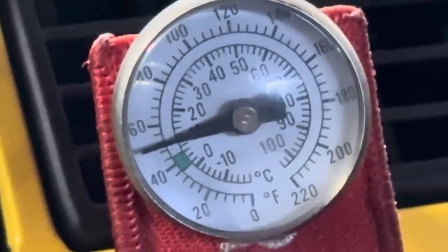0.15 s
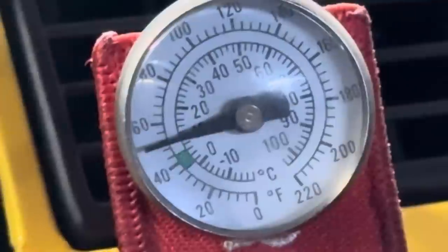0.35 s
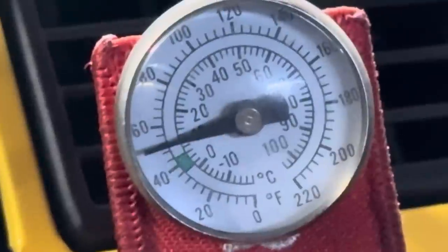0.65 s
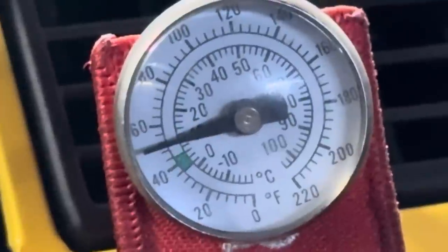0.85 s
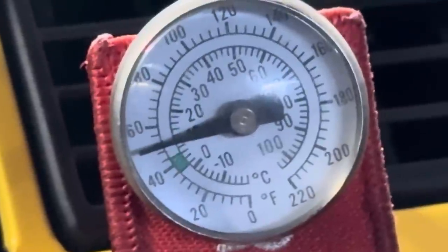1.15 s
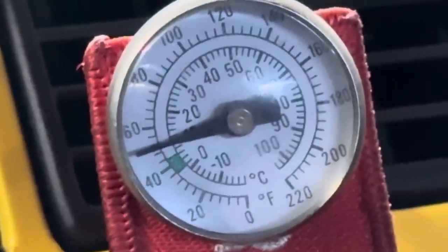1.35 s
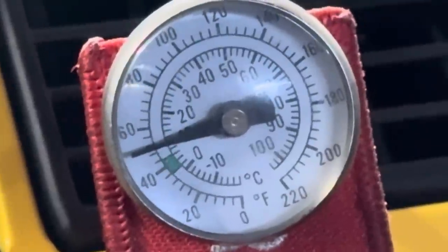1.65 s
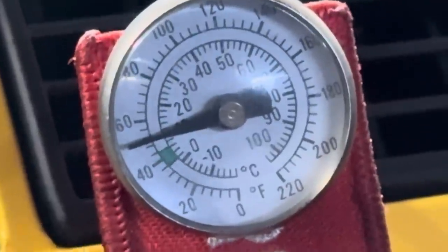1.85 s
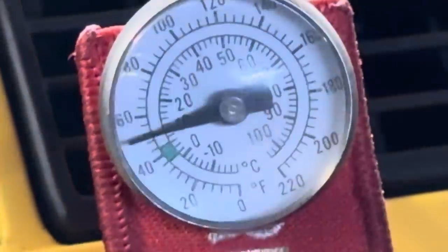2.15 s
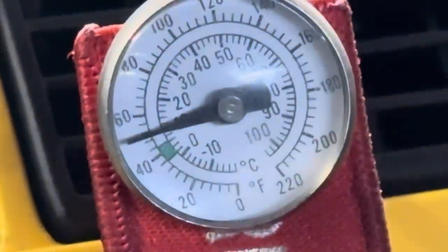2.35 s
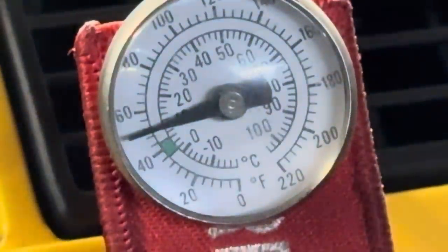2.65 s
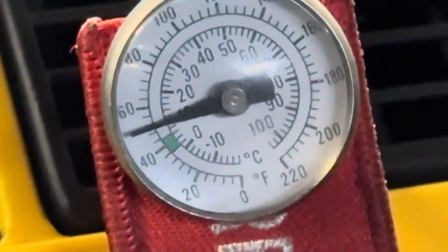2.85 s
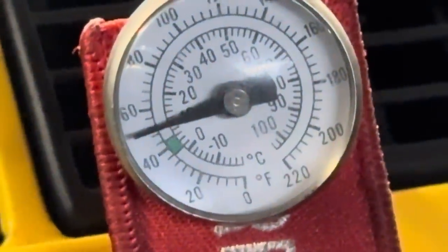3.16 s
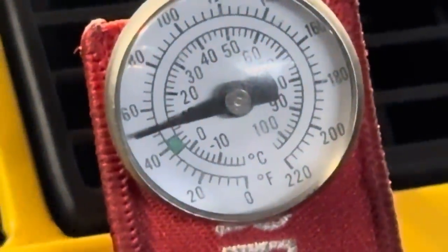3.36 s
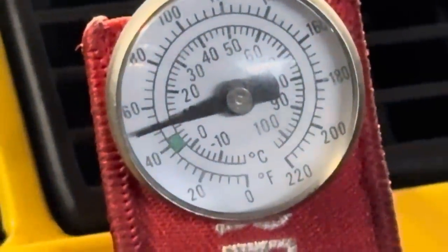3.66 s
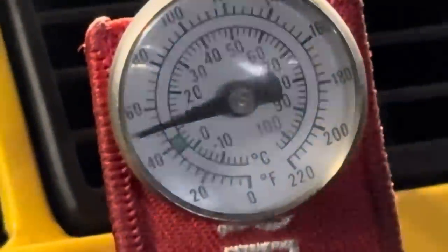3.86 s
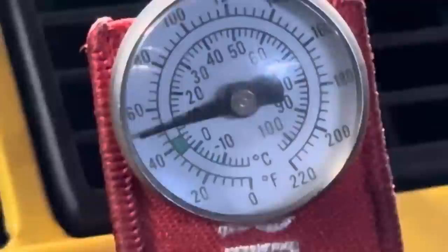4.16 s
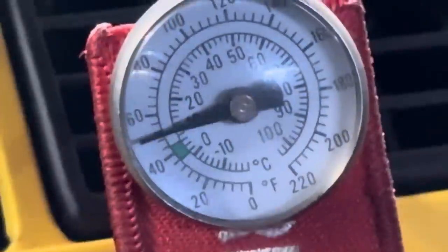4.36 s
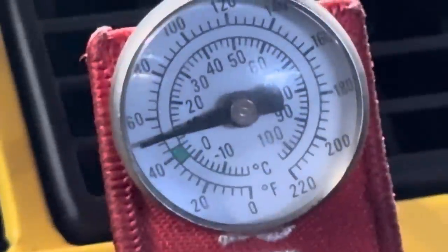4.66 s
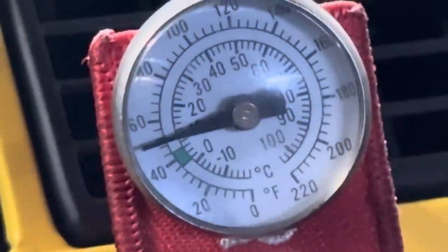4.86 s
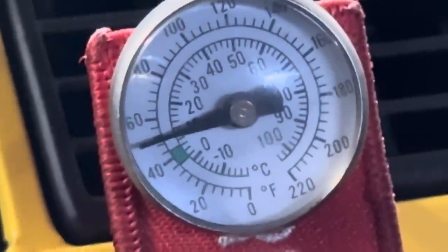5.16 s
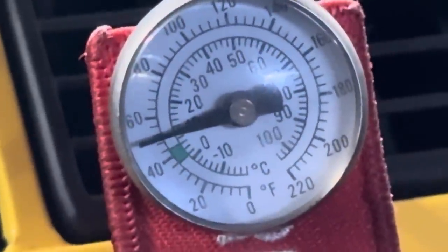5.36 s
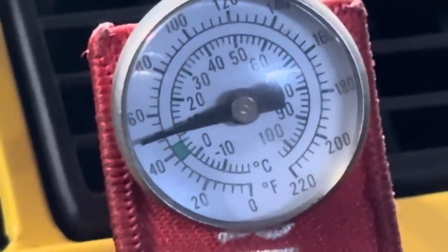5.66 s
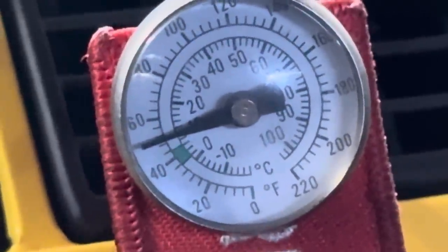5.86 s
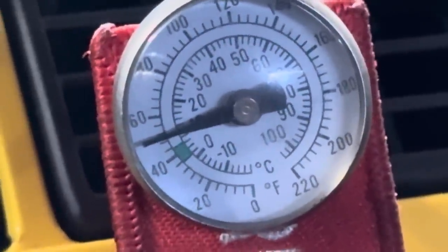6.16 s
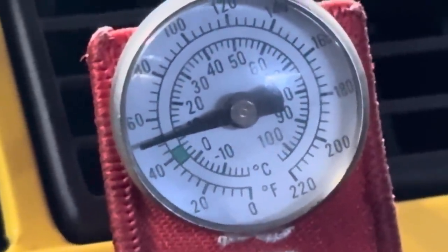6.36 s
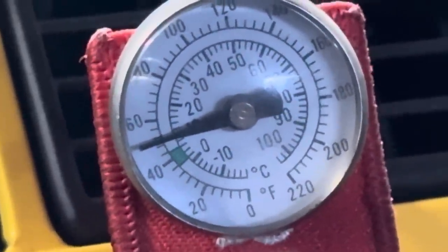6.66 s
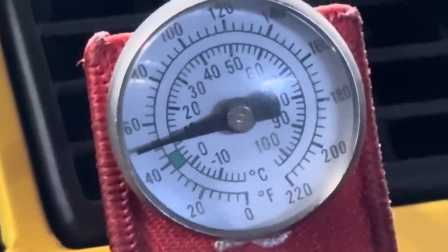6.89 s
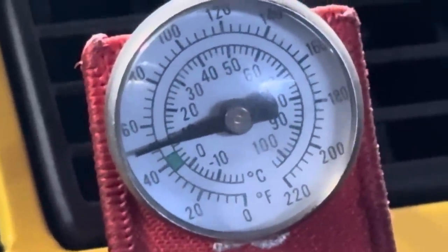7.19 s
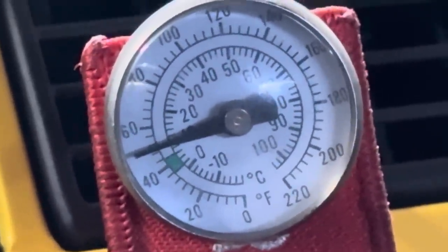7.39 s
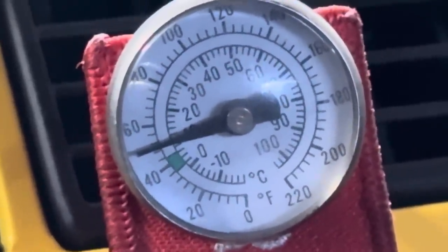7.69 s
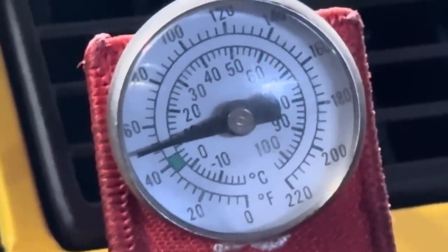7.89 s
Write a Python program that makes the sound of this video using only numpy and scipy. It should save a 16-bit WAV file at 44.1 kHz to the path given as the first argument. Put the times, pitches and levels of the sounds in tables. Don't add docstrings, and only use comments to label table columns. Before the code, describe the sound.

Steady blower noise from a ribbed duct, broad and airy with a coloured, tubular midrange and softer hiss above. Wind rolls over the close microphone, giving random low puffs, rumble and buffeting, sometimes clustered, slightly shifting between left and right. A weak wavering motor tone leans left beneath it. The sound is close and dry, already running at the start and still running at the end.

```python
import sys
import numpy as np
from scipy import signal
from scipy.fft import irfft
from scipy.io import wavfile
from scipy.ndimage import uniform_filter1d

SR = 44100
rng = np.random.default_rng(int(sys.argv[2]) if len(sys.argv) > 2 else 0)


def amp(db):
    return 10 ** (np.asarray(db, float) / 20)


def write(x):
    x = np.atleast_2d(x).T
    wavfile.write(sys.argv[1], SR, np.round(np.clip(x, -1, 1) * 32767).astype(np.int16))


N = 354123

# (pitch [Hz], left level [dB], right level [dB], lag of the right port [turns])
MOTOR_TONES = [
    (570, -47, -74, 0.072),
    (758, -49.5, -58, 0.56),
]
# (frequency [Hz], level [dB per Hz])
RUSH_SPECTRUM = [(30, -9.5), (120, 3.5), (400, -2.5), (900, -4), (1150, -6.5), (1650, -11.5), (2200, -15),
                 (4200, -23), (6500, -27.5), (8200, -28.5), (10300, -32), (11800, -40), (14400, -41),
                 (16500, -43)]
# (frequency [Hz], width [Hz], left level [dB], right level [dB])
DUCT_MODES = [(695, 92, -0.5, 5), (866, 39, 0.5, 5.5), (995, 37, 4, 0.5), (1056, 69, -6.5, -2.5),
              (1280, 79, -5, 1), (1357, 111, 13, 12), (1543, 72, 8, 5), (1645, 83, -5.5, 1.5),
              (1740, 64, 3, 6), (1813, 78, -1.5, -4), (1950, 30, 6.5, 7.5)]
# (frequency [Hz], width [Hz], level [dB])
TREBLE_RIPPLE = [(2290, 37, -2.5), (2570, 56, -1.5), (2700, 76, 3), (2795, 58, -9), (2890, 100, 3),
                 (3565, 124, 4), (3690, 36, 5), (4064, 130, 5.5), (4470, 77, 2.5), (5300, 360, 2),
                 (14400, 600, 2)]
# (frequency [Hz], lag of the right port [turns], likeness [0-1])
PORT_LAGS = [(0, 0, .95), (700, .05, .85), (950, 0, .85), (1180, .12, .85), (1350, 0, .98), (1600, .06, .9),
             (1750, -.04, .9), (2050, -.01, .999), (2550, .01, .999), (2900, .08, .985), (3400, .09, .97),
             (4050, .055, .98)]
# (from [Hz], to [Hz])
STEP_BANDS = [(4350, 7550), (8400, 9500), (10900, 11650), (13330, 13700), (15250, 16000)]
# (time [s], level [dB])
GUSTS_OF_JET = [(0.0, -31.5), (0.38, -30), (0.51, -30), (1.54, -32.5), (1.97, -29), (2.59, -34.5),
                (3.11, -30.5), (3.78, -30.5), (3.91, -28), (4.27, -30.5), (5.68, -28.5), (5.95, -35),
                (6.66, -30), (6.98, -31), (7.16, -27.5), (8.03, -32)]
# (frequency [Hz], level [dB per Hz])
RUMBLE_SPECTRUM = [(20, -25), (45, 2), (62, 5), (82, 2), (105, -0.5), (140, -17), (250, -48)]
# (frequency [Hz], level [dB per Hz])
BUFFET_SPECTRUM = [(60, -6), (100, 1), (160, -1), (300, -3.5), (500, -13.5), (800, -22), (1500, -53.5)]
# (frequency [Hz], level [dB per Hz])
WAKE_SPECTRUM = [(60, -15), (150, 1), (350, -1.5), (550, -4.5), (800, -17), (1300, -45)]
# (time [s], peak level [dB], size as pitch [Hz], level of the larger swing dragged along [dB])
STRONG_EDDIES = [(0.01, -15.5, 361, -2), (0.177, -20, 316, -18), (0.674, -16.5, 443, -13),
                 (1.252, -18, 257, 8), (1.285, -12, 515, -14), (1.614, -13.5, 343, -4),
                 (1.663, -22, 515, -9), (1.766, -21, 480, 6), (1.999, -20.5, 363, 9.5),
                 (2.181, -19, 312, -9), (2.363, -21.5, 447, -5), (2.445, -20.5, 256, -12),
                 (2.768, -21.5, 413, -12), (3.1, -15.5, 258, 5.5), (3.27, -16.5, 525, 1.5),
                 (4.214, -8, 586, 0.5), (4.634, -19, 443, -5), (4.698, -15, 378, 2),
                 (5.082, -17.5, 316, -5), (5.179, -17, 253, 6), (5.302, -18, 520, -8),
                 (5.531, -18, 552, -10), (5.59, -17, 260, 6), (5.877, -18.5, 274, 2),
                 (5.958, -15.5, 450, 3), (6.457, -16, 860, -4), (6.62, -16.5, 724, 3.5),
                 (7.114, -16, 644, 0), (7.631, -19.5, 363, -8), (7.821, -18.5, 272, 6.5)]
# (time [s], peak level [dB], size as pitch [Hz], level of the dragged swing [dB])
WEAK_EDDIES = [(0.29, -21.5, 389, -9), (0.402, -19.5, 635, -1), (0.457, -25.5, 222, -9),
               (0.867, -19.5, 190, -10), (1.028, -21, 447, -4), (1.166, -21, 326, 6.5),
               (1.224, -20, 389, -5), (1.533, -23, 644, -10), (1.639, -23, 363, -8), (1.708, -23, 389, -4),
               (1.872, -23.5, 360, -9), (2.108, -16, 318, 3), (2.969, -20.5, 236, 6), (2.997, -22, 222, -8),
               (3.141, -26, 338, -13), (3.386, -22, 274, -11), (3.737, -20, 356, -5), (4.047, -23, 239, 1),
               (4.562, -20, 206, -12), (4.965, -22, 363, 2), (5.343, -18.5, 192, -2), (5.677, -19, 386, -2),
               (5.788, -22.5, 192, -6), (6.157, -20.5, 218, -13), (6.2, -20.5, 222, -4),
               (6.395, -19, 294, -14), (6.769, -20.5, 389, 6), (6.925, -21, 389, -4), (7.224, -31, 239, -7),
               (7.737, -19.5, 480, -12)]
# (time [s], peak level [dB], size as pitch [Hz])
SLOW_EDDIES = [(0.065, -11, 130), (0.184, -17, 105), (0.301, -21, 85), (0.559, -23, 98), (0.707, -18, 79),
               (0.912, -19, 91), (1.302, -34, 98), (1.647, -16, 68), (2.198, -15, 129), (2.365, -14.5, 78),
               (2.464, -18, 79), (2.541, -18, 73), (2.778, -14.5, 107), (4.029, -13, 121), (4.514, -21, 91),
               (4.658, -36, 68), (4.966, -18, 113), (5.22, -18, 73), (5.324, -21, 72.6), (5.36, -38, 68),
               (5.551, -18, 98), (5.6, -7.5, 121), (5.662, -16.5, 121), (5.689, -25, 79),
               (5.884, -12.5, 85), (6.65, -18, 79.5), (6.803, -15.5, 121), (7.129, -22, 98),
               (7.21, -12.5, 114), (7.325, -21, 105)]

MIDDLE_HZ = 258


def evened(x):
    return x / np.sqrt(np.mean(x ** 2) + 1e-20)


def read(points, hz):
    f, value = np.transpose(points)
    return np.interp(np.log(hz + 1), np.log(f + 1), value, right=-200)


def smoothed(x, first, second):
    return uniform_filter1d(uniform_filter1d(x, first), second)


def wander(seconds):
    span = max(int(seconds * SR), 2)
    return evened(smoothed(rng.standard_normal(N), span, span))


def paired(likeness, hz):
    a, b, c, d = rng.standard_normal((4, len(hz)))
    likeness = np.clip(likeness, 0, 1)
    left = a + 1j * b
    own = c + 1j * d
    return np.array([left, likeness * left + np.sqrt(1 - likeness ** 2) * own])


def whine():
    speed = np.cumsum(1 + 0.0033 * wander(0.09)) / SR
    out = np.zeros((2, N))
    for hz, left_db, right_db, lag in MOTOR_TONES:
        tone = np.sqrt(2) * np.sin(2 * np.pi * (hz * speed - np.array([[0], [lag]])))
        out += tone * amp([[left_db], [right_db]]) * amp(2.0 * wander(0.074))
    return out


def port_pair(hz):
    tilt_turns = 0.02
    steps = []
    for k, (low_hz, high_hz) in enumerate(STEP_BANDS):
        tilt = tilt_turns * min(k, 1)
        steps.append((low_hz, k / 2 - tilt, 0.998))
        steps.append((high_hz, k / 2 + tilt, 0.998))
    climbs = [(edge + 270, turns + 0.155, 0.96) for edge, turns, _ in steps[1:-1:2]]
    f, turns, likeness = np.transpose(sorted(list(map(tuple, PORT_LAGS)) + steps + climbs))
    return np.interp(hz, f, turns), np.interp(hz, f, likeness)


def rush():
    level_db = -30
    hz = np.fft.rfftfreq(N, 1 / SR)
    turns, likeness = port_pair(hz)
    noise = paired(likeness, hz)
    noise[1] *= np.exp(-2j * np.pi * turns)
    modes = list(DUCT_MODES) + [(f0, width, db, db) for f0, width, db in TREBLE_RIPPLE]
    duct_db = np.zeros((2, len(hz)))
    for f0, width, left_db, right_db in modes:
        bump = np.exp(-.5 * ((hz - f0) / (0.58 * width)) ** 2)
        duct_db += np.outer([left_db, right_db], bump)
    air = evened(irfft(noise * amp(read(RUSH_SPECTRUM, hz) + duct_db), N))
    return amp(level_db + 0.15 * wander(0.08) + 0.22 * wander(0.007)) * air


def gust_db(s):
    return np.interp(s, *np.transpose(GUSTS_OF_JET))


def stirring(swings, lag_s, hold_s):
    span = max(int(hold_s * SR), 2)
    power = abs(smoothed((swings ** 2).mean(0), span, span // 2 + 1))
    return np.roll(np.tanh(np.sqrt(power) / amp(-25.0)), int(lag_s * SR))


def turbulence(spectrum, level_db, likeness, lumpy_db, lump_s):
    hz = np.fft.rfftfreq(N, 1 / SR)
    push = irfft(paired(likeness, hz) * amp(read(spectrum, hz)), N)
    return amp(level_db) * evened(push * amp(lumpy_db * wander(lump_s)))


def jet(swings):
    stir_db = 9.5
    level_db = gust_db(np.arange(N) / SR)
    rumble_db = level_db - 5.5 + stir_db * stirring(swings, lag_s=0.023, hold_s=0.03)
    buffet_db = level_db - 4.5 + 0.76 * stir_db * stirring(swings, lag_s=0, hold_s=0.023)
    rumble = turbulence(RUMBLE_SPECTRUM, rumble_db, 0.92, lumpy_db=1.5, lump_s=0.021)
    buffet = turbulence(BUFFET_SPECTRUM, buffet_db, 0.87, lumpy_db=4.0, lump_s=0.012)
    return (rumble + buffet) * amp([[-.3], [.3]])


def wake(swings):
    power = uniform_filter1d((swings ** 2).mean(0), 700, origin=200)
    strength = np.sqrt(abs(uniform_filter1d(power, 500)))
    hz = np.fft.rfftfreq(N, 1 / SR)
    swirls = evened(irfft(paired(0.99, hz) * amp(read(WAKE_SPECTRUM, hz)), N))
    return amp(-4.0) * strength * swirls


def strays(count):
    low_hz, high_hz = 92, 480
    when, size, strength = rng.random((count, 3)).T
    s = when * N / SR
    db = -22.5 + gust_db(s) - gust_db(s).mean() - 2 * np.log(.05 + strength)
    return list(zip(s, db, low_hz * (high_hz / low_hz) ** size))


def followers(heads):
    from_s, to_s = -0.0122, 0.028
    late, strength = rng.random((len(heads), 2)).T
    s, db, hz = np.transpose(heads)
    s = s + from_s + (to_s - from_s) * late
    db = np.minimum(db, -16) - 9 - 4 * strength
    return list(zip(s, db, hz * 0.57 ** late))


def dragged(s, db, hz, drag_db):
    low_hz = 151 * (hz / MIDDLE_HZ) ** 0.76
    return s + 0.42 / low_hz, db + drag_db - 2.0, low_hz


def eddies():
    listed = list(STRONG_EDDIES) + list(WEAK_EDDIES)
    heads = [(s, db + 3.5, hz) for s, db, hz, drag_db in listed]
    drags = [dragged(*row) for row in listed]
    slow = [(s - .002, db - 2.5, hz) for s, db, hz in SLOW_EDDIES]
    rows = heads + drags + slow + followers(heads) + followers(heads) + strays(count=45)
    chance = rng.random((len(rows), 3))
    out = np.zeros((2, N + SR))
    for (s, db, hz), (start, skew, side) in zip(rows, chance):
        cycles = np.arange(-2, 3, hz / SR)
        shape = np.exp(-.5 * (cycles / np.where(cycles < 0, .56, .72)) ** 2)
        slowing = cycles - 0.16 * cycles ** 2 / (1 + 0.34 * abs(cycles))
        lag = np.array([[0], [0.062 * (skew - .3)]])
        suction = .5 + .2 * (start - .5)
        swing = shape * np.cos(2 * np.pi * (slowing + suction - lag))
        pan_db = 0.2 * max(np.log2(hz / MIDDLE_HZ), 0) + 3.5 * (2 * side - 1) - .3
        at = max(round((s - 2 / hz) * SR), 0)
        out[:, at:at + len(cycles)] += swing * amp(db - 2.0 + pan_db * np.array([[.5], [-.5]]))
    return out[:, :N]


def scene():
    swings = eddies()
    return whine() + rush() + jet(swings) + wake(swings) + swings


def roll_off(x):
    return signal.sosfilt(signal.butter(12, 16810, fs=SR, output="sos"), x)


def record(dry):
    wind_filter = signal.butter(3, 40, "high", fs=SR, output="sos")
    filtered = signal.sosfilt(wind_filter, dry)
    band_limit = signal.firwin(2047, 15790, window=("kaiser", 10), fs=SR)
    limited = signal.oaconvolve(filtered, band_limit[None], "same")
    return roll_off(limited)


dry = scene()
out = record(dry)
write(out)
```